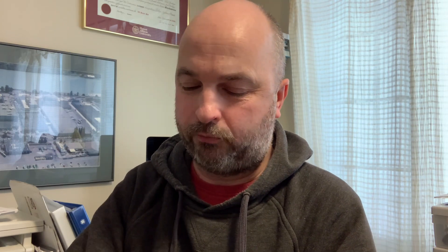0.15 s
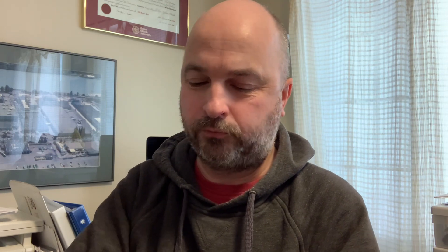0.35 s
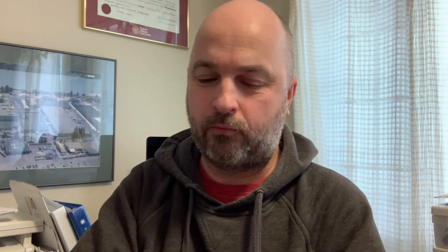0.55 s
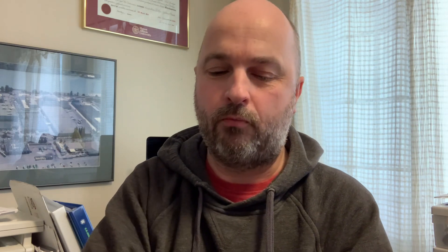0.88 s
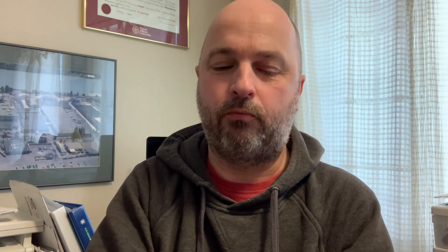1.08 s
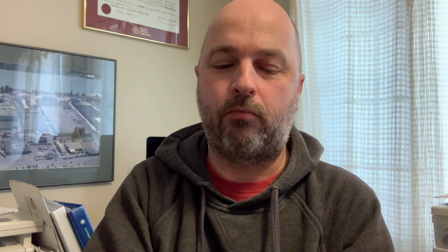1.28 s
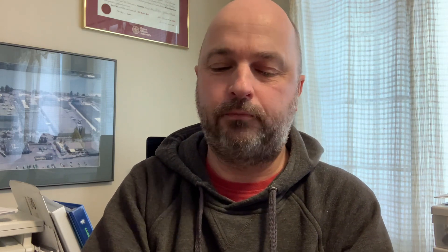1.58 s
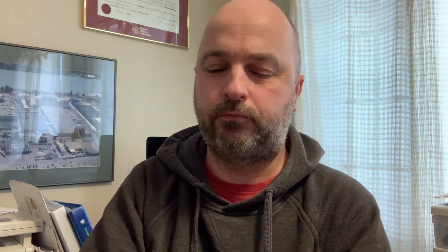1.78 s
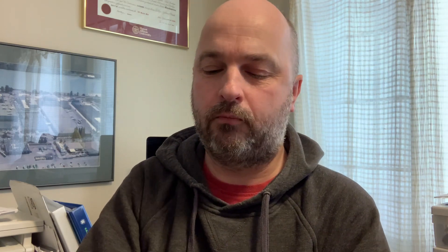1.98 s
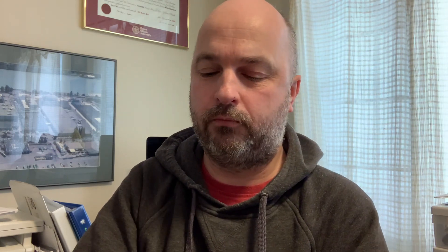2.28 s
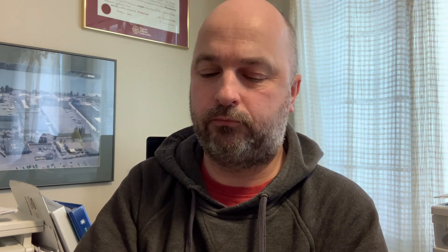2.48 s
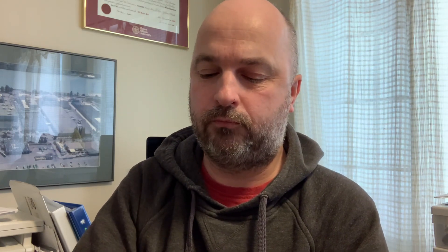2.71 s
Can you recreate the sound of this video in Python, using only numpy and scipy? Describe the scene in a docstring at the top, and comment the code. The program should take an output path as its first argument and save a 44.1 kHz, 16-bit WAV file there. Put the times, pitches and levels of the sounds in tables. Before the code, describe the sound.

A plastic candy wrapper crinkles close by. A soft finger slide opens it, then crackles build to strong snaps around 0.35-0.65 s, with small hollow pops at 0.4 and 0.66. Bursts follow at 0.8-0.86 and 1.04-1.27, a lull to 1.53, scattered snaps, then dense crackling at 2.05-2.6 with a soft knock near 2.2. It fades to a light rustle over faint small-room noise.

```python
"""A plastic candy wrapper is picked open by hand at a desk in a small office, with two close microphone ports.
Over faint steady room noise the film rustles with tiny cracks, and a finger slides on it at the start.
Then creases snap one by one as noise bursts, and each squeeze lets off a shower of tiny cracks.
Now and then a panel of film flips over with a hollow pop of damped sines; later, fingers knock the packet.
Near reflections from the desk and a brief ring of the room follow each sound."""
import sys
import numpy as np
from scipy import signal
from scipy.fft import rfft, irfft, next_fast_len
from scipy.io import wavfile

SR = 44100
rng = np.random.default_rng(int(sys.argv[2]) if len(sys.argv) > 2 else 0)


def master_out(mix):
    """Clip the mix to full scale and print it as 16-bit PCM to the path in sys.argv[1]."""
    frames = np.transpose(np.atleast_2d(mix))
    ceiling = np.clip(frames, -1, 1)
    pcm = np.round(ceiling * 32767).astype(np.int16)
    wavfile.write(sys.argv[1], SR, pcm)


N = 125685
TIME = np.arange(N) / SR  # seconds


def from_db(db):
    """Decibels to gain."""
    return 10 ** (np.asarray(db) / 20)


def at_hz(points, hz):
    """Read a table on a log-frequency axis."""
    point_hz, values = np.transpose(points)
    return np.interp(np.log(np.maximum(hz, 1)), np.log(point_hz), values)


def shaped(x, response):
    """Filter by a response given as a function of frequency."""
    size = next_fast_len(2 * N)
    hz = np.arange(size // 2 + 1) * SR / size
    return irfft(rfft(x, size) * response(hz), size)[..., :N]


def bands():
    """Centre in Hz, width in kHz and filter of each of 16 bands."""
    edges = np.geomspace(120, 17500, 17)
    for low, high in zip(edges, edges[1:]):
        sos = signal.butter(2, [low, high], "band", fs=SR, output="sos")
        yield np.sqrt(low * high), (high - low) / 1000, sos


def air():
    """Faint steady noise of the room, partly alike at the two ports."""
    # spectrum of the room noise before its overall level is set: hz, gain_db
    air_colour = [(25, -16), (70, 3), (150, -0.5), (250, -2), (900, -3.5), (16000, -48)]
    level_db, alike = -65.5, 0.16  # alike: share of the power common to both ports
    common, separate = rng.standard_normal(N), rng.standard_normal((2, N))
    noise = np.sqrt(alike) * common + np.sqrt(1 - alike) * separate
    noise = shaped(noise, lambda hz: from_db(at_hz(air_colour, hz)) * (hz > 20))
    return from_db(level_db) * noise / noise.std()


def crinkle():
    """Tiny cracks, each with its own size and favoured pitches, come thicker and stronger in each squeeze."""
    # squeezes of the fingers: middle_s, half_length_s, level_db, extra_body_db (around body_hz)
    squeezes = [(0.255, 0.028, -46, -0.5), (0.348, 0.028, -38.5, 4), (0.557, 0.023, -39, 2),
                (0.625, 0.021, -46, -21), (0.805, 0.025, -43, 0), (0.861, 0.021, -39, -1.5),
                (1.067, 0.013, -41.5, 4.5), (1.24, 0.018, -52, 9), (1.542, 0.014, -42, -29),
                (1.935, 0.012, -46.5, -13), (2.049, 0.0116, -40, -9), (2.133, 0.013, -43, -2),
                (2.322, 0.022, -43, -7), (2.445, 0.0084, -32, 4), (2.47, 0.026, -39, -8.5),
                (2.665, 0.017, -46, -4.5)]
    # light rustle under and between the squeezes: time_s, level_db
    rustle_levels = [(0, -58), (.18, -56.5), (.96, -54.5), (1.05, -49.5), (1.3, -57), (1.39, -63.5),
                     (1.56, -54), (2.25, -55.5), (2.37, -51), (2.7, -51.5), (2.85, -63.5)]
    # colour of the tiny cracks: hz, gain_db
    crinkle_colour = [(150, -12), (400, -11), (1300, 3), (2500, -0.5), (6500, -2), (10000, 1.5), (13000, 4),
                      (16000, -20)]
    cracks_per_s, crack_s = 800, 0.00051  # rate at mean effort; shortest decay time
    spread_db, tint_db = 6.5, 8
    body_hz, body_octaves = 860, 1.14
    rub = 0.054  # film rubbing on film: smooth share of the power

    rustle = from_db(np.interp(TIME, *np.transpose(rustle_levels))) ** 2
    swells = []
    for middle, half, db, body_db in squeezes:
        swell = from_db(db) ** 2 * np.exp(-((TIME - middle) / half) ** 2)
        swells.append((swell, body_db))
    effort = rustle + sum(swell for swell, _ in swells)
    rate = cracks_per_s * (effort / effort.mean()) ** .15
    born = rng.random(N) < rate / SR
    sizes = from_db(spread_db * np.minimum(rng.exponential(1, N), 2.8)) ** 2
    tint = rng.uniform(0, 2 * np.pi, N)
    out = 0
    for hz, _, sos in bands():
        near_body = np.exp(-(np.log2(hz / body_hz) / body_octaves) ** 2)
        power = rustle + sum(swell * from_db(body_db * near_body) ** 2 for swell, body_db in swells)
        energy = sizes * from_db(tint_db * np.cos(2 * np.log2(hz) + tint)) ** 2
        # dividing by the rate makes denser cracks smaller, so effort alone sets the mean power
        cracks = born * energy / energy.mean() * SR / rate
        drive = (rub + (1 - rub) * cracks) * power + 1e-18
        keep = np.exp(-2 / (SR * (crack_s + 1 / hz)))  # lower bands die more slowly
        envelope = np.sqrt(signal.lfilter([1 - keep], [1, -keep], drive))
        hiss = signal.sosfilt(sos, envelope * rng.standard_normal(N))
        out = out + hiss * from_db(1 + at_hz(crinkle_colour, hz))
    return out


def slides():
    """Skin sliding on the film gives a soft, narrow hiss."""
    # fingers sliding over the film: middle_s, half_length_s, centre_hz, level_db
    strokes = [(0.034, 0.067, 717, -59), (0.022, .06, 1900, -64)]
    width_octaves = .17
    out = 0
    for middle, half, centre, db in strokes:
        hiss = shaped(rng.standard_normal(N),
                      lambda hz: 1 / (1 + (np.log2((hz + 1) / centre) / width_octaves) ** 2))
        swell = np.exp(-.5 * ((TIME - middle) / half) ** 2)
        out = out + from_db(db) * hiss / hiss.std() * swell
    return out


def snaps():
    """Each crease gives way in a short noise burst with a colour of its own; the lows last longer."""
    # creases snapping, levels before the common colour: start_s, low_db, middle_db, high_db
    creases = [(0.0812, -74, -46, -43), (0.2214, -52, -38.5, -39.5), (0.3126, -64, -44, -43),
               (0.32, -51, -39, -49), (0.3587, -41.5, -24, -37.5), (0.3961, -42, -21, -42),
               (.403, -48, -36.5, -31.5), (0.489, -52, -29.5, -39), (0.5352, -41.5, -34, -42.5),
               (0.558, -42, -26.5, -52), (0.5952, -54, -45, -40), (0.6043, -49, -30.5, -34.5),
               (0.6598, -46.5, -22.5, -44), (0.8014, -37.5, -33, -37.5), (0.841, -49, -41, -36.5),
               (1.0389, -44.5, -51, -42.5), (1.0516, -59, -35, -35.5), (1.133, -53, -40.5, -42.5),
               (1.1758, -45.5, -46, -45), (1.2, -113, -40, -34.5), (1.231, -40.5, -37, -32.5),
               (1.2745, -54, -38, -32), (1.5334, -46.5, -46.5, -31), (1.6614, -59, -37, -42),
               (1.7259, -36, -34.5, -34.5), (1.778, -56, -41.5, -47), (1.802, -42, -36, -35.5),
               (1.8753, -81, -57, -39.5), (2.0452, -48.5, -58, -36.5), (2.121, -55, -34.5, -56),
               (2.2109, -45, -35, -39), (2.2922, -54, -29.5, -53), (2.32, -63, -35, -39.5),
               (2.4067, -45.5, -43, -37), (2.419, -46, -33.5, -46), (2.4281, -68, -42, -36),
               (2.449, -48, -48, -39), (2.5049, -49, -32.5, -52.5), (2.5625, -58, -47, -45),
               (2.5846, -48, -35, -33)]
    # frequencies at which those three levels apply: low_hz, middle_hz, high_hz
    level_hz = (1100, 3800, 10500)
    # colour common to all snaps: hz, gain_db
    snap_colour = [(380, -10), (700, 0.5), (1300, 1), (2500, -7.5), (6500, -7.5), (10000, 3.5),
                   (12800, -6.5), (16000, -23)]
    crack_s, crack_cycles = .0005, 1.6  # a snap decays over a fixed time plus some cycles
    ring_spread = .45  # how unevenly a crease rings from band to band (log of the cycles)

    count = len(creases)
    out = np.zeros(N + SR)
    age = np.arange(1024) / SR
    span = .005 * SR  # samples over which a burst's energy is reckoned
    for hz, khz, sos in bands():
        unevenness = np.exp(ring_spread * np.clip(rng.standard_normal((count, 1)), -2, 2))
        decay = crack_s + crack_cycles / hz * unevenness
        noise = rng.standard_normal((count, len(age)))
        bursts = signal.sosfilt(sos, noise * np.exp(-age / decay))
        bursts *= np.sqrt(span * khz / np.sum(bursts ** 2, axis=1, keepdims=True))
        for (s, *levels), burst in zip(creases, bursts):
            level = np.interp(np.log(hz), np.log(level_hz), levels)
            start = int(s * SR)
            out[start:start + len(age)] += burst * from_db(level - 4 + at_hz(snap_colour, hz))
    return out[:N]


def ring(s, hz, t60):
    """A damped sine that starts at time s and falls 60 dB in t60 seconds."""
    age = np.maximum(TIME - s, 0)
    return np.sin(2 * np.pi * hz * age) * from_db(-60 * age / t60)


def pops():
    """A flipping panel rings for a moment with a few close modes; it is too small to radiate bass."""
    # panels of film flipping over: start_s, pitch_hz, level_db
    flips = [(.246, 1000, -35), (.4045, 856, -31.5), (.662, 1330, -27.5), (0.671, 1350, -36),
             (1.06, 6520, -29.5), (1.662, 790, -43), (2.219, 1300, -39), (2.292, 2930, -33.5),
             (2.335, 1530, -37.5)]
    # modes of a panel: ratio_to_pitch, level_db
    panel_modes = [(.66, -9.5), (.85, -1), (1, 3)]
    out = 0
    for s, hz, db in flips:
        modes = sum(from_db(db + mode_db) * ring(s, hz * ratio, .017) for ratio, mode_db in panel_modes)
        bass_cut = signal.butter(2, hz, "high", fs=SR, output="sos")
        out = out + signal.sosfilt(bass_cut, modes)
    return out


def knocks():
    """A soft knock swells and dies within a few cycles of each mode, so its pitch seems to fall."""
    # fingers knocking the packet's body: start_s, level_db, tilt_db_per_octave
    taps = [(1.231, -45.5, 8.5), (1.274, -55.5, 1.5), (1.436, -55, -0.5), (2.2105, -41, 4.5),
            (2.66, -50, 1.5)]
    # modes of the packet: mode_hz, level_db
    packet_modes = [(147, -6), (280, -11.5), (430, -10), (620, -1), (870, -2)]
    peak_cycles = 2.46  # each mode is loudest after this many cycles
    out = 0
    middle = np.median([hz for hz, _ in packet_modes])
    for s, db, tilt in taps:
        for hz, mode_db in packet_modes:
            cycles = np.maximum(TIME - s, 0) * hz
            swell = (cycles / peak_cycles * np.exp(1 - cycles / peak_cycles)) ** 3
            gain = from_db(db + mode_db + tilt * np.log2(hz / middle))
            out = out + gain * swell * np.sin(2 * np.pi * cycles)
    return out


def desk(x):
    """Near reflections, dulled, whose paths to each port wander as the hands move."""
    # reflections from the desk and nearby things: mean_delay_s, level_db
    echoes = [(.0006, -23), (.0016, -11), (.0027, -4.5), (.013, -15)]
    out = np.zeros((2, N))
    for port in out:
        for delay, db in echoes:
            wander = np.sin(2 * np.pi * (rng.uniform(1, 2) * TIME + rng.random()))
            path = delay * (1 + .25 * wander)
            port += from_db(db) * np.interp(TIME - np.round(path * SR) / SR, TIME, x, left=0)
    treble_cut = signal.butter(1, 6060, fs=SR, output="sos")
    return signal.sosfilt(treble_cut, out)


def office(x):
    """A short diffuse tail of decaying noise, different at each port."""
    # strength of the room's ring: hz, gain_db
    room_colour = [(1000, -4), (4500, 0), (10000, -16.5)]
    t60_s, build_s = 0.22, 0.0003
    age = TIME[:SR // 2]
    decay = from_db(-60 * age / t60_s) * (1 - np.exp(-age / build_s))
    tail = rng.standard_normal((2, len(age))) * decay
    tail /= np.sqrt(np.sum(tail ** 2, axis=1, keepdims=True))
    ringing = signal.fftconvolve(x[None], tail, axes=1)[:, :N]
    return shaped(ringing, lambda hz: from_db(at_hz(room_colour, hz)))


def scene():
    """The wrapper reaches the two ports directly, off the desk and through the room."""
    # phase between the ports: hz, left_lead_radians
    port_phase = [(700, 1.6), (1600, 0.5), (3900, 1.36), (5300, 1.5), (8500, -3.5), (10000, -2.5),
                  (12500, -6), (15000, -6.5)]
    wrapper = snaps() + crinkle() + pops() + slides() + knocks()
    near = wrapper + desk(wrapper)
    sides = np.array([[1], [-1]])  # each port takes half the phase
    direct = shaped(near, lambda hz: np.exp(.5j * at_hz(port_phase, hz) * sides))
    return direct + office(wrapper) + air()


def record(dry):
    """The left port takes more bass; the top is cut steeply above 16.2 kHz."""
    # level between the ports: hz, left_minus_right_db
    port_balance = [(150, 7), (600, 2.5), (1700, 0.06)]
    sides = np.array([[1], [-1]])
    heard = shaped(dry, lambda hz: from_db(.5 * at_hz(port_balance, hz) * sides))
    top_cut = signal.ellip(10, .2, 70, 16200, fs=SR, output="sos")
    return signal.sosfilt(top_cut, heard)


dry = scene()
out = record(dry)
master_out(out)
```